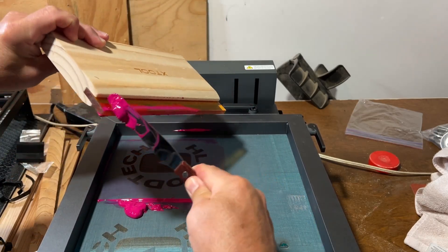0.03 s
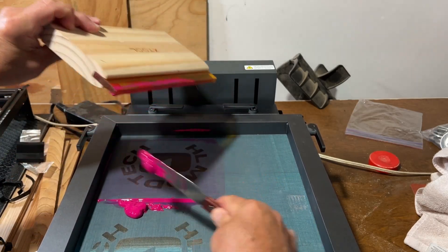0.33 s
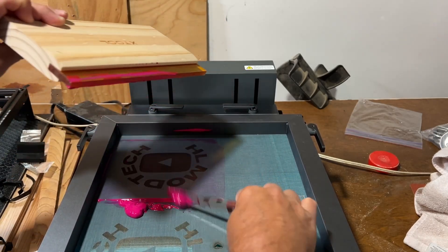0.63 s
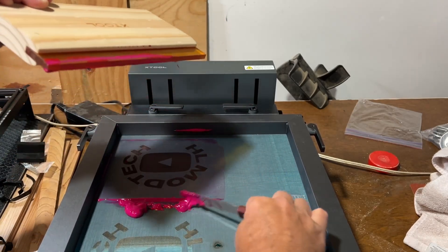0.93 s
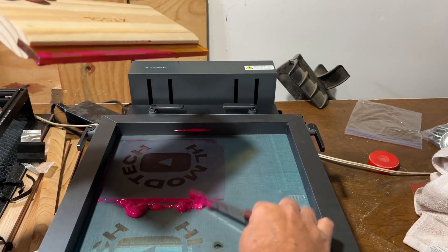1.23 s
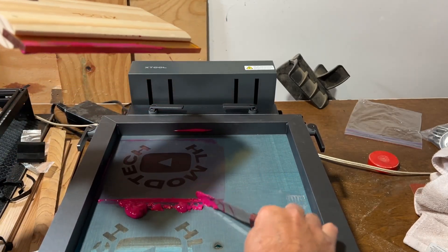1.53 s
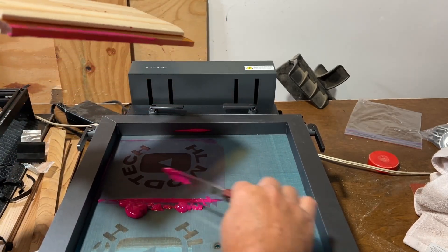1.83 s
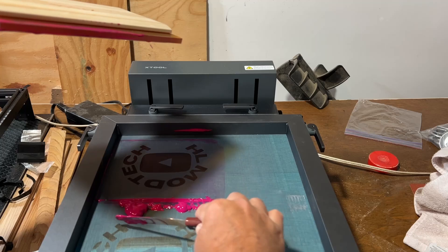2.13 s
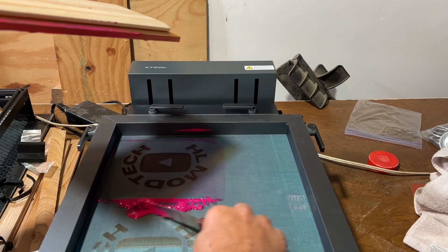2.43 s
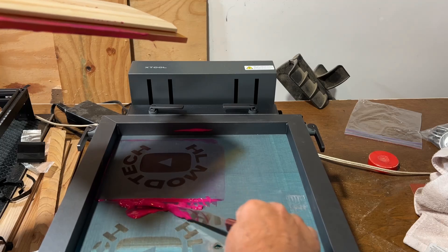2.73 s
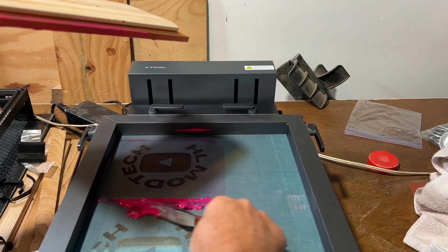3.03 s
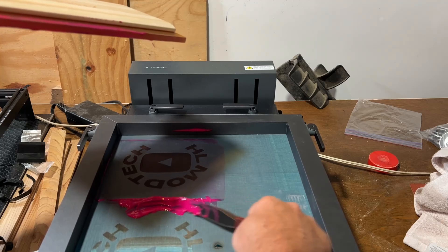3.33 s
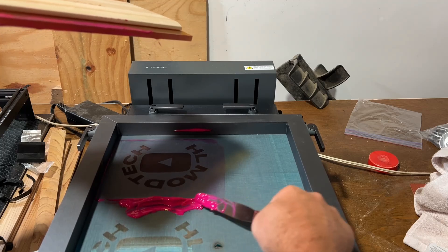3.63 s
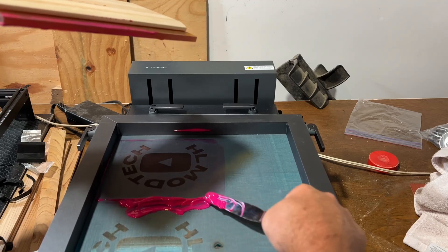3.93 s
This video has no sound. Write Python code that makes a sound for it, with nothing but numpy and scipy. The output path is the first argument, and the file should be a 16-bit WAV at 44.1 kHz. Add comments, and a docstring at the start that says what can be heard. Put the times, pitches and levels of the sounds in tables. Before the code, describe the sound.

Close by in a small, faintly humming workshop, a metal spatula dabs ink onto a stretched screen with soft, low thumps and faint wet squeaks. The blade then wipes across the mesh five times, each a short zip.

```python
"""A small workshop hums low. A steel spatula softly smears ink, with thin wet squeaks, and dabs it
onto a taut screen-printing mesh, which answers like a slack drum. The blade then wipes the ink off
in five quick strokes that zip as the edge plucks thread after thread.
A pair of microphone ports is close by."""
import sys
import numpy as np
from scipy import signal
from scipy.fft import rfft, irfft
from scipy.io import wavfile

SR = 44100
rng = np.random.default_rng(int(sys.argv[2]) if len(sys.argv) > 2 else 0)


def wrap_up_sound(samples):
    """Save the sound to the file named by the first command line argument, as 16-bit audio."""
    columns = np.atleast_2d(samples).T
    # keep every value between -1 and 1, then stretch to whole-number steps
    tamed = np.clip(columns, -1, 1)
    steps = np.round(tamed * 32767).astype(np.int16)
    wavfile.write(sys.argv[1], SR, steps)


N = 176400
T = np.arange(N) / SR


def amp(db):
    """Decibels to gain."""
    return 10 ** (np.asarray(db) / 20)


def unit(x):
    """Scale to rms 1."""
    return x / np.sqrt(np.mean(x ** 2) + 1e-20)


def read(points, hz):
    """Interpolate a table over log frequency."""
    f, value = np.transpose(points)
    return np.interp(np.log(hz + 1), np.log(f + 1), value)


def add(mix, start_s, sound):
    """Mix in a stereo sound."""
    part = mix[:, max(round(start_s * SR), 0):][:, :sound.shape[1]]
    part += sound[:, :part.shape[1]]


def equalise(x, curve):
    """Filter by a gain curve in dB."""
    return irfft(rfft(x) * amp(read(curve, np.fft.rfftfreq(len(x), 1 / SR))), len(x))


def colour(x, spectrum):
    """Shape a steady sound's spectrum, rms 1."""
    return unit(equalise(x, spectrum))


def wander(n, cutoff_hz):
    """Low-passed random drift, rms 1."""
    hz = np.fft.rfftfreq(n, 1 / SR)
    return unit(irfft(rfft(rng.standard_normal(n)) / (1 + (hz / cutoff_hz) ** 4), n))


def spread(x):
    """The part of a diffuse sound that differs between the ports."""
    # (frequency [Hz], side gain [dB])
    side_gain = [(60, -21), (250, -14.5), (600, -1), (1200, 3), (2000, -18), (3500, -1), (7000, -4.5),
                 (13000, -14.5)]
    return equalise(x, side_gain)


def background(rumble_db=-46.5, side_db=-4, waver_rad=0.22):
    """Low room rumble with a wavering hum."""
    # (frequency [Hz], relative level [dB])
    rumble_spectrum = [(12, -60), (20, -42), (44, -0.5), (66, 4.5), (85, -14.5), (119, 4.5), (137, -9),
                       (202, -8.5), (260, -17), (406, -16), (441, -22), (1020, -29.5), (2100, -42.5),
                       (2480, -49.5), (15600, -67)]
    # (frequency [Hz], level [dB])
    hum_tones = [(59.2, -55.5), (114, -66)]
    mid, side = (colour(rng.standard_normal(N), rumble_spectrum) for _ in range(2))
    hum = sum(amp(db) * unit(np.sin(2 * np.pi * hz * T + waver_rad * wander(N, 4.6)))
              for hz, db in hum_tones)
    return hum + amp(rumble_db) * (mid + amp(side_db) * spread(side) * np.array([[1], [-1]]))


def grains(n, rate_hz=9000, size_db=2.2):
    """Dense tiny slips of uneven size."""
    slips = rng.standard_normal(n) * (rng.random(n) < rate_hz / SR)
    return slips * amp(size_db * np.minimum(rng.exponential(1, n), 4))


def smear(flutter_db=2.0):
    """The flat of the blade slides slowly through ink."""
    # (time [s], level [dB])
    smear_envelope = [(.28, -91), (.4, -69.5), (.5, -81), (.7, -62), (.9, -74), (1.04, -64.5), (1.11, -88),
                      (1.2, -74), (1.3, -62.5), (1.5, -62), (1.6, -68.5), (1.7, -69), (1.76, -104),
                      (2.22, -82.5), (2.245, -59), (2.268, -38), (2.31, -51), (2.42, -43), (2.452, -39),
                      (2.5, -57), (2.68, -70), (2.92, -73.5), (3.62, -76), (3.73, -53), (3.87, -61),
                      (4, -64)]
    # (frequency [Hz], relative level [dB])
    ink_spectrum = [(100, -11.5), (450, 4), (900, 1.5), (1700, 3.5), (3000, -2), (5000, -5.5), (7500, -8.5),
                    (10000, -12.5), (13000, -16), (16000, -13.5)]
    level_db = np.interp(T, *np.transpose(smear_envelope)) + flutter_db * wander(N, 60)
    return amp(level_db) * colour(grains(N), ink_spectrum)


def workshop(x, tail_db=-8.5, early_db=-5, early_s=0.011):
    """Direct sound, quick reflections off bench and frame, and the room's tail."""
    # (frequency [Hz], relative level [dB])
    echo_spectrum = [(50, -2.5), (130, -8), (300, 3), (500, 2), (800, 0.5), (1300, 0.5), (2000, -0.5),
                     (15000, 0)]
    # (frequency [Hz], t60 [s])
    room_decay = [(60, 0.91), (200, 0.57), (420, 0.66), (1000, 0.3), (1750, 0.31), (2800, 0.27),
                  (5000, 0.3), (9000, 0.16), (15000, 0.17)]
    t = np.arange(SR // 2) / SR
    mid, side = rng.standard_normal((2, len(t)))
    echoes = np.array([colour(mid + sign * spread(side), echo_spectrum) for sign in (1, -1)])
    hz, frame_s, bands = signal.stft(echoes, SR, nperseg=256)
    bands *= 1000 ** (-frame_s / read(room_decay, hz)[:, None])
    tail = signal.istft(bands, SR, nperseg=256)[1][:, :len(t)] * np.minimum(t / 0.015, 1)
    tail *= amp(tail_db) / np.linalg.norm(tail[0])
    early = echoes[:, ::-1] * np.exp(-t / early_s) * (t > .001)
    early *= amp(early_db) / np.linalg.norm(early[0])
    return signal.fftconvolve(x[None], (t == 0) + early + tail, axes=1)


def squeak(length_s, start_hz, end_hz, level_db, jitter):
    """Four points of the wet edge glide in pitch together, swell and fade."""
    progress = np.arange(0, length_s, 1 / SR) / length_s
    glide_hz = start_hz + (end_hz - start_hz) * progress
    strands = np.zeros(len(progress))
    for detune in np.linspace(-.06, .06, 4):
        gain = rng.uniform(0.79, 1)
        hz = glide_hz * (1 + detune + jitter * wander(len(progress), 660))
        strands += gain * np.sin(2 * np.pi * np.cumsum(hz) / SR)
    return amp(level_db) * unit(np.sin(np.pi * progress) * strands)


def tick(t, rise_s=.0004, decay_s=0.0028, tail_s=0.027):
    """Steel meets wet thread."""
    # (frequency [Hz], relative level [dB])
    tick_spectrum = [(300, -9), (1500, 8.5), (3000, 8), (7000, -1.5), (12000, -6), (16000, -12)]
    envelope = (np.exp(-t / decay_s) + 0.19 * np.exp(-t / tail_s)) * (1 - np.exp(-t / rise_s))
    return envelope * colour(grains(len(t)), tick_spectrum)


def knock(t, rise_s=0.0014, snap_s=0.0027, t60_s=0.17):
    """Dense upper mesh modes, as decaying noise."""
    # (frequency [Hz], relative level [dB])
    knock_spectrum = [(100, -40), (250, -0.5), (450, 2), (750, -4), (1150, 1.5), (1500, -5.5),
                      (2100, -11.5), (2800, -26), (5000, -35.5), (15000, -50)]
    envelope = (1000 ** (-t / t60_s) + 1.98 * np.exp(-t / snap_s)) * (1 - np.exp(-t / rise_s))
    return envelope * colour(rng.standard_normal(len(t)), knock_spectrum)


def mesh_ring(t, boom_db, ring_db, boom_top_hz=140, spot_db=1.5, detune=0.018):
    """Low modes of the stretched mesh; each landing spot favours different ones."""
    # (frequency [Hz], relative level [dB], t60 [s])
    mesh_modes = [(65.2, 10.5, 0.12), (79.2, 12.5, 0.12), (115.5, -7.5, 0.91), (152.6, -12, 0.35),
                  (207.7, 2.5, 0.1), (289.5, -7, 0.23), (351.2, -5.5, 0.17), (403.7, -7.5, 0.19),
                  (439.3, -13, 0.44), (482.5, -8, 0.13), (509, -9, 0.19), (558, -12.5, 0.14),
                  (675.4, -15, 0.11)]
    mesh = np.zeros(len(t))
    for k, (hz, db, t60_s) in enumerate(mesh_modes):
        spot, tension = rng.standard_normal(2)
        drive_db = boom_db if hz < boom_top_hz else ring_db + spot_db * spot
        mode = np.sin(2 * np.pi * hz * (1 + detune * tension) * t)
        mesh += (-1) ** k * amp(drive_db + db) * 1000 ** (-t / t60_s) * mode
    return mesh


def tap(boom_db, ring_db, knock_db, tick_db, travel_s=.0003, drag_s=0.01096, drag_hz=399):
    """The blade ticks, then the mesh rings; air drags on it, so the bass arrives last."""
    t = np.arange(SR // 2) / SR
    mesh = mesh_ring(t, boom_db, ring_db) + amp(knock_db + 1) * knock(t)
    hz = np.fft.rfftfreq(SR, 1 / SR)  # 1 Hz bins
    delay_s = travel_s + drag_s / (1 + hz / drag_hz)
    mesh = irfft(rfft(mesh, SR) * np.exp(-2j * np.pi * np.cumsum(delay_s)))[:len(t)]
    return mesh + amp(tick_db + 7.5) * tick(t)


def threads(hz, jitter=0.0452, shimmer=0.12, wander_hz=530, db_per_octave=-14.5):
    """The edge plucks thread after thread: an uneven tone that follows its speed."""
    phase = 2 * np.pi * np.cumsum(hz * (1 + jitter * wander(len(hz), wander_hz))) / SR
    tone = sum(amp(db_per_octave * np.log2(k)) * np.sin(k * phase) for k in range(1, 5))
    return unit(tone * (1 + shimmer * wander(len(hz), wander_hz)))


def wipe(cross_ratio, cross_db, hiss_db, path):
    """One quick stroke: tones from warp and weft, rasp on the threads, fine blade hiss."""
    # Both: (frequency [Hz], relative level [dB])
    rasp_spectrum = [(60, -35), (250, -13.5), (600, -5), (1150, 2.5), (2000, 1.5), (3000, -3), (4000, -12),
                     (7000, -19.5), (15000, -53)]
    hiss_spectrum = [(1000, -13), (3000, 0), (5000, -2.5), (7500, -3), (10000, -9), (13000, -8.5),
                     (16000, -16)]
    time_s, level_db, crossing_hz, tone_share = np.transpose(path)
    t = np.arange(time_s[0], time_s[-1], 1 / SR)
    hz = np.interp(t, time_s, crossing_hz)
    share = np.clip(np.interp(t, time_s, tone_share), 0, .95)
    tone = amp(-0.5) * unit(threads(hz) + amp(cross_db) * threads(hz * cross_ratio))
    rasp = amp(-2.5) * colour(grains(len(t)), rasp_spectrum)
    hiss = amp(hiss_db - 13) * colour(grains(len(t)), hiss_spectrum)
    stroke = np.sqrt(share) * tone + np.sqrt(1 - share) * (rasp + hiss)
    return time_s[0], amp(np.interp(t, time_s, level_db)) * stroke


def scene():
    """Hum, smear, squeaks, taps and wipes; each spot on the mesh has its own echoes."""
    # (start [s], length [s], start pitch [Hz], end pitch [Hz], level [dB], pitch jitter [ratio])
    blade_squeaks = [(0.499, 0.22, 2650, 2830, -73.5, 0.06), (.55, 0.44, 12500, 11900, -86, 0),
                     (1.182, 0.4, 13000, 12800, -69.5, 0.13), (0.68, 0.035, 5500, 4470, -55, 0.34),
                     (1.672, 0.031, 6000, 4960, -56.5, .25), (2.252, 0.045, 2360, 1790, -48, 0.15),
                     (2.27, 0.19, 12700, 14700, -68, 0.06), (2.334, 0.05, 580, 515, -50, .02),
                     (2.42, 0.063, 2100, 2935, -51, 0.2), (2.483, .25, 2422, 2502, -62.5, 0.19),
                     (2.459, 0.24, 13500, 12460, -70.5, .01), (2.602, 0.092, 15300, 11700, -66, 0.03),
                     (3.644, 0.098, 11800, 15100, -70, .005)]
    # Relative levels: (time [s], boom [dB], ring [dB], knock [dB], tick [dB])
    blade_taps = [(.642, -30, -25.5, -34, -57), (0.703, -40, -40, -50.5, -52),
                  (.816, -25.5, -25.5, -25, -37), (.969, -36, -31.5, -41.5, -63),
                  (1.138, -27.5, -25, -32, -51), (1.207, -44, -33.5, -59, -55), (1.3, -25.5, -18, -26, -69),
                  (1.458, -25.5, -16, -27, -72), (1.603, -26.5, -22.5, -34, -57),
                  (1.685, -47, -60, -45, -49), (2.219, -47, -56, -43, -45), (2.729, -34.5, -36, -47.5, -50),
                  (3.007, -35, -30, -37, -45.5), (3.289, -45, -39, -42, -53),
                  (3.512, -46.5, -42.5, -46, -56), (3.719, -70, -52, -54.5, -48),
                  (3.766, -46, -36, -42.5, -56)]
    # (cross-thread pitch [ratio], cross-thread gain [dB], hiss trim [dB], path)
    # path: (time [s], level [dB], thread crossing rate [Hz], tone share [0-1])
    blade_wipes = [ (2.1, -16, 3, [(2.727, -56, 1290, 0), (2.75, -34, 1585, 0.04), (2.772, -37, 1569, 0),
                   (2.785, -30.5, 1420, .4), (2.8, -43.5, 1430, 0.36), (2.815, -48, 1090, 0.9)]),
                   (.5, -14.5, 6.5, [(3.008, -42, 1088, .1), (3.032, -23, 1764, .35),
                   (3.046, -26, 1987, 0.77), (3.056, -21, 2051, 0.97), (3.072, -25.5, 2255, 0.53),
                   (3.085, -24, 1995, 0.98), (3.096, -25, 1595, 0.85), (3.11, -30.5, 1110, 0.73),
                   (3.14, -43.5, 904, 0.77)]), (1.5, -17, 2.5, [(3.29, -42.5, 961, 0),
                   (3.306, -26.5, 1302, 0.5), (3.316, -24, 1635, .7), (3.334, -28.5, 1672, 0.8),
                   (3.344, -19.5, 1770, 0.78), (3.359, -32, 1736, 0.9), (3.378, -61, 1850, 0.5)]),
                   (1.52, -8.5, -1.5, [(3.512, -65, 899.4, 0.2), (3.538, -29, 1091, 0.06),
                   (3.551, -26.5, 1268, 0.4), (3.564, -24, 1498, 0.38), (3.582, -28.5, 1600, .7),
                   (3.606, -45, 1654, 1)]), (.44, 1.5, -3.5, [(3.764, -49, 1304, 0),
                   (3.786, -26.5, 2405, 0), (3.802, -21, 2703, 0.2), (3.815, -24.5, 2965, 0.5),
                   (3.828, -29.5, 2615, 0.93), (3.845, -33, 2126, 0.02), (3.87, -41, 1212, 0.7)])]
    mix = background()
    add(mix, 0, workshop(smear()))
    for start_s, *settings in blade_squeaks:
        add(mix, start_s, workshop(squeak(*settings)))
    for start_s, *levels_db in blade_taps:
        add(mix, start_s, workshop(tap(*levels_db), tail_db=-10))
    for settings in blade_wipes:
        start_s, stroke = wipe(*settings)
        add(mix, start_s, workshop(stroke))
    return mix


def record(dry):
    """The two ports differ in phase and level; a low-pass limits the band."""
    # (frequency [Hz], left lead [rad])
    port_phase = [(20, -1), (400, 0.47), (1180, 0.4), (1350, 1), (1500, -2), (1700, 0.2), (2000, 1.3),
                  (3200, 0.78), (4800, -0.14), (5800, -2), (6600, 0.2), (7300, 0.7), (8700, -0.66),
                  (9500, -12), (10300, -26), (11200, -4), (12000, -7.5), (13400, -3.5), (15200, -9)]
    # (frequency [Hz], left minus right [dB])
    port_balance = [(60, 0), (400, 2), (1000, 0.4), (2400, 1.8), (6000, 3), (10000, -1.5)]
    hz = np.fft.rfftfreq(N + SR, 1 / SR)
    half = np.array([[.5], [-.5]])
    ports = amp(half * read(port_balance, hz)) * np.exp(1j * half * read(port_phase, hz))
    heard = irfft(rfft(dry, N + SR) * ports, N + SR)[:, :N]
    band_limit = signal.firwin(511, cutoff=15700, window=("kaiser", 9), fs=SR)
    return signal.oaconvolve(heard, band_limit[None], "same")


dry = scene()
out = record(dry)
wrap_up_sound(out)
```